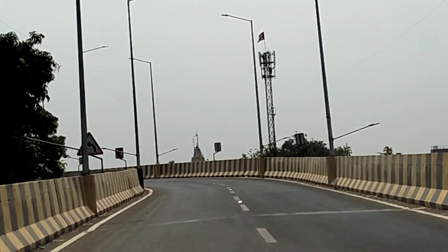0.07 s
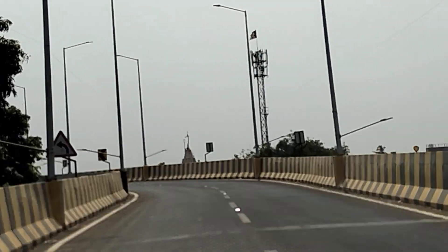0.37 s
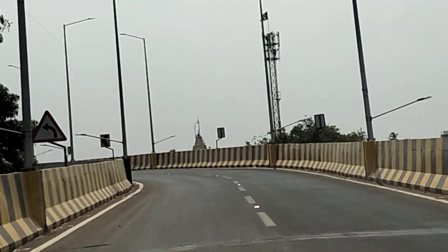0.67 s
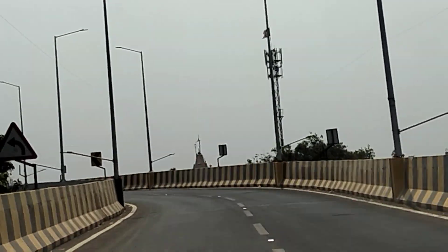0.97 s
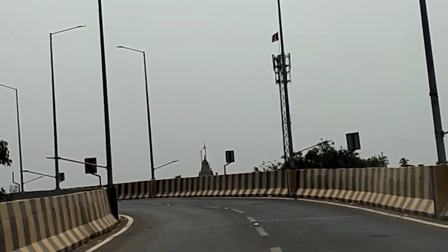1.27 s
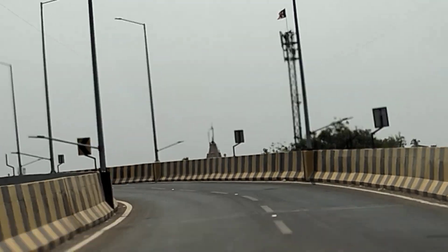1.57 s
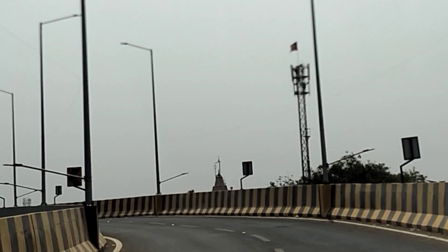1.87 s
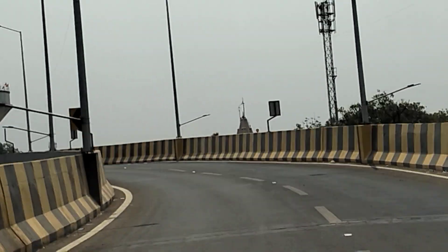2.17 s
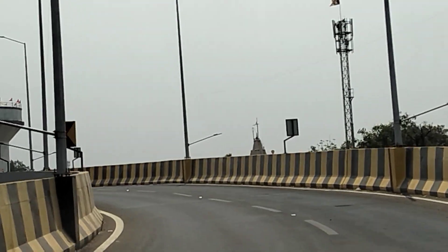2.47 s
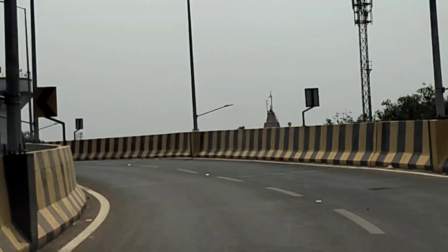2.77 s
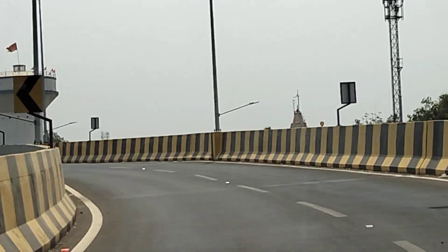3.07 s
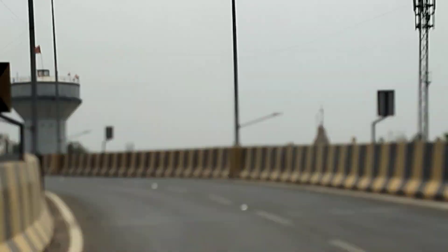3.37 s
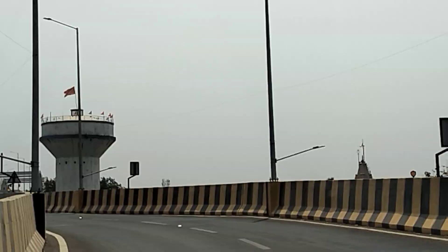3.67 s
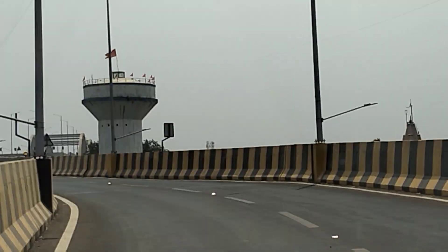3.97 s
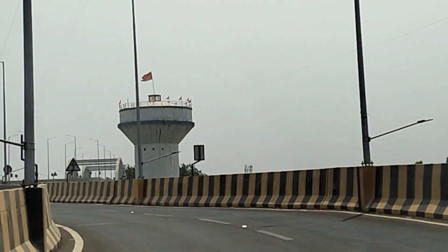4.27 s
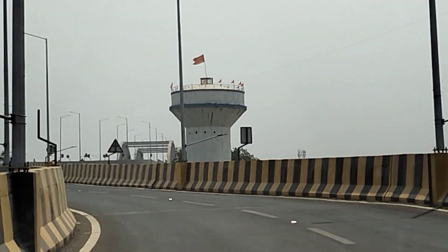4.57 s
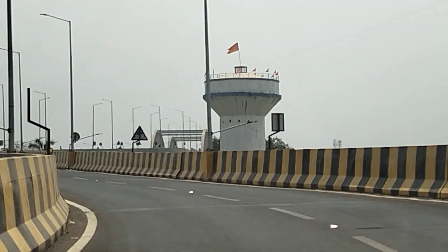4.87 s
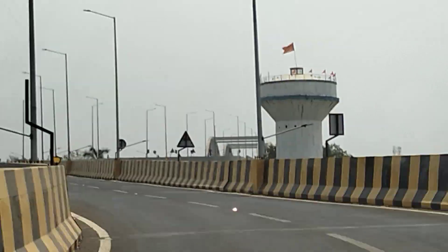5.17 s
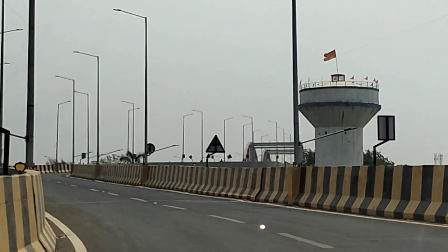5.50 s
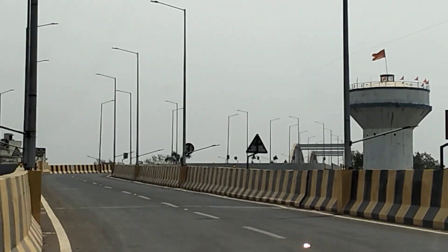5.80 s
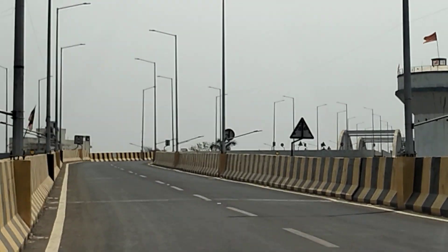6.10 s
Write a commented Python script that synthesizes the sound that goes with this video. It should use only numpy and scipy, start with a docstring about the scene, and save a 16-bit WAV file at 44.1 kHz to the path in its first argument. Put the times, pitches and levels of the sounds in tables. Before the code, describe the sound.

Low road rumble and tyre hiss inside a moving car, with heavy wheel thumps over road joints and small trim rattles.

```python
"""Inside a car rounding a concrete flyover, slowing a little. From the start road rumble fills the cabin;
tyres and wind hiss at the right window. About every 1.5 s the front, then the rear wheels thump over
an expansion joint and hop once. A gain control ducks after each heavy thump and slowly recovers.
Small bumps follow between the joints; the trim ticks, rattles and creaks."""
import sys
import numpy as np
from scipy import signal
from scipy.fft import rfft, irfft
from scipy.io import wavfile

SR = 44100
rng = np.random.default_rng(int(sys.argv[2]) if len(sys.argv) > 2 else 0)


def store_pcm(level_fs):
    """Save levels as 16-bit WAV."""
    pcm = np.round(np.clip(level_fs, -1, 1) * 32767).astype(np.int16)
    wavfile.write(sys.argv[1], SR, np.atleast_2d(pcm).T)


N = 275184
TIME, FREQ = np.arange(N) / SR, np.maximum(np.arange(N // 2 + 1) * SR / N, 1)

# likeness of left and right in the cabin: f/Hz, correlation
CABIN_CORRELATION = [(100, 0.98), (190, 0.98), (300, 0.69), (480, 0.41), (680, 0.51), (850, -0.53),
                     (1300, -0.21), (3000, -0.095)]
# road rumble, relative density: f/Hz, left/dB, right/dB
RUMBLE_SPECTRUM = [(28, -38, -38.5), (45.3, -42.5, -40.5), (72.4, -42, -41), (92, -41, -39),
                   (120, -40.5, -40), (149, -44.5, -44), (194.5, -44, -41.5), (218.4, -55.5, -48.5),
                   (346.6, -50.5, -48), (420, -58, -58.5), (566, -62.5, -62.5)]
# roar, the upper part of the rumble: t/s, level/dB
ROAR_SWELL = [(0, 0.8), (0.36, 1), (0.6, 0), (0.95, 1.5), (1.45, 0.2), (1.75, 0), (2.1, -1), (2.5, -0.5),
              (3.1, 1), (3.45, -1.5), (4.05, -1.8), (4.6, 0.4), (5.25, -0.9), (5.65, -0.7), (6.24, 1.2)]
# tyre and wind hiss, relative density: f/Hz, left/dB, right/dB
HISS_SPECTRUM = [(670, -71.5, -64.5), (900, -65, -69), (1020, -71, -75.5), (1630, -76.5, -67),
                 (2310, -79.5, -71.5), (2670, -82.5, -74), (4480, -87, -76.5), (4760, -87, -74),
                 (6140, -90.5, -86), (7560, -101.0, -86.5), (9120, -100.9, -100.7), (10930, -100.8, -90),
                 (12100, -102.5, -90.5), (14100, -107.6, -97.5)]
# course of the hiss: t/s, level/dB
HISS_SWELL = [(0, -0.5), (0.35, 0), (0.6, -0.3), (0.8, -0.5), (1.4, 0.8), (2.1, -0.8), (2.4, -0.9),
              (2.72, 1.0), (3.15, 0.1), (3.5, -0.5), (3.8, -0.7), (4.5, 0.9), (5.4, 0), (6.24, 1)]
# resonances of tread and glass: f/Hz, width/Hz, left/dB, right/dB
TREAD_GLASS_MODES = [(845, 40, -45.5, -74), (948.5, 41, -46.5, -44.5), (1155, 35, -48.5, -46.5),
                     (1253, 28, -49, -57), (1363, 22, -64, -53.5), (2177, 16, -82, -58),
                     (3783, 66, -65.5, -54.5), (4474, 70, -89, -52.5), (5100, 220, -64, -58)]
# resonances of the window seal: f/Hz, width/Hz, level/dB
SEAL_MODES = [(1559, 51, -44.5), (1620, 52, -53.5), (1787, 90, -45.5), (2476, 130, -53)]
# course of the seal's song: t/s, level/dB
SEAL_SWELL = [(0.15, 3), (0.6, 0.5), (1.4, 2), (2.3, 0), (2.75, 3.5), (3.3, 1), (3.9, 0), (4.55, 2),
              (6.24, -1.5)]
# panel creaks: t/s, level/dB, f/Hz, t60/s
PANEL_CREAKS = [(0.118, -27.5, 1750, 0.07), (4.516, -41, 3860, 0.16), (5.204, -30.5, 2200, 0.1),
                (5.36, -39, 4100, .16)]
# rattles of a loose part: t/s, level/dB
PART_RATTLES = [(1.771, -42), (1.931, -42.5), (3.445, -47)]
# trim ticks: t/s, tick/dB, snap/dB
TRIM_TICKS = [(1.683, -18, -28), (1.695, -17, -27), (1.741, -21, -30), (1.93, -25, -40), (3.45, -21, -33),
              (4.531, -30, -26.5), (5.195, -20, -35)]
# tick colour, relative density: f/Hz, level/dB
TICK_SPECTRUM = [(300, -10), (750, 15.5), (1150, 14), (1700, -13), (2500, -14), (4400, -8.5), (6500, -15),
                 (9000, -32), (13000, -29)]
# hardest blows, reaching the suspension: t/s, tyre boom/dB, clunk/dB
HARD_KNOCKS = [(0.222, -22, -13.5), (0.251, -7, -23), (1.698, -25, -13.5), (1.716, -7.5, -18),
               (1.869, -18, -22), (3.232, -29, -16.5), (4.907, -13, -14)]
# tread slap on a joint's edge, relative density: f/Hz, level/dB
SLAP_SPECTRUM = [(60, -5), (110, -16), (200, -6.5), (340, -3), (500, -4), (700, -13), (1400, -21),
                 (4000, -51)]
# body and cabin modes, from heave on the springs up: f/Hz, t60/s, front axle/dB, rear axle/dB
BODY_MODES = [(4.15, 0.8, -10.5, 6), (30.85, 0.46, -23.5, -7.5), (47.6, 0.29, -16, -8.5),
              (59.2, 0.427, -19.5, -8.5), (93.65, 0.31, -5.5, -8.5), (112.8, 0.34, -4, -18.5),
              (153.5, 0.25, -22, -39), (190.8, 0.22, -26, -25)]
# small bumps in the asphalt: t/s, blow/dB
ASPHALT_BUMPS = [(0.956, -6.5), (1.09, -6.5), (1.262, -11), (2.545, -8), (2.798, -11.5), (3.04, -10),
                 (4.161, -10), (4.29, -7.5), (4.37, -9), (4.468, -10.5)]
# four wheels in turn per joint, front pair first: t/s, blow/dB, rear share/0-1, hop/dB re blow, slap/dB
JOINT_HITS = [(0.222, 0.5, 0.2, 0.5, -17.5), (0.2413, -2.5, 0, -22, -23), (0.3842, 1, 1, -12, -35),
              (0.42, -0.2, 0.83, -2.5, -30), (1.6888, -2.5, 1, -25, -21), (1.725, -1, 0.53, -21, -24),
              (1.8634, 2, 0.89, -12, -37), (1.8905, 1.5, 0.93, -9, -30), (3.2318, 3, 0.58, -12, -23.5),
              (3.29, 1.5, 0.28, -6.5, -35), (3.4245, 2, 0.96, -34, -33), (3.4502, -0.5, 1, -3, -25),
              (4.9289, 1.5, 0.57, -9, -20.5), (4.955, -4, 0.02, -1, -35), (5.1417, 3, 1, -7.5, -36),
              (5.18, -7.5, 0.93, -12, -40)]


def from_db(db):
    """Decibels to gain."""
    return np.exp(np.asarray(db) * (np.log(10) / 20))


def rms_one(x):
    """Scale to unit rms."""
    return x / np.sqrt(np.mean(x ** 2) + 1e-20)


def over_hz(points):
    """Table columns interpolated over log frequency."""
    hz, *columns = np.transpose(points)
    return np.array([np.interp(np.log(FREQ), np.log(hz), c) for c in columns])


def over_time(points):
    """Table interpolated over time."""
    return np.interp(TIME, *np.transpose(points))


def resonance(hz, width_hz):
    """Amplitude per root Hz of a unit-power resonance."""
    shape = 1 / (1 + ((FREQ - hz) / (0.83 * width_hz)) ** 2)
    return shape / np.sqrt(np.sum(shape ** 2) * SR / N)


def noise(gain):
    """Noise of a given amplitude per root Hz."""
    real, imaginary = rng.standard_normal((2, len(FREQ))) * gain
    return irfft(real + 1j * imaginary, N) * np.sqrt(N * SR) / 2


def drift(rate_hz):
    """Slow random wander, unit rms."""
    return rms_one(noise(1 / (1 + (FREQ / rate_hz) ** 2)))


def cabin_noise(gain):
    """Diffuse stereo noise; the sides agree only in the bass."""
    mid, side = rfft(rng.standard_normal((2, N)))
    alike = over_hz(CABIN_CORRELATION)
    pair = np.sqrt(1 + alike) * mid + np.sqrt(1 - alike) * side * [[1], [-1]]
    return irfft(pair * gain, N) * np.sqrt(SR) / 2


def burst(start_s, rise_s, t60_s):
    """Envelope of a blow: quick rise, exponential decay."""
    envelope, first = np.zeros(N), int(start_s * SR)
    age = TIME[:min(int(2 * t60_s * SR), N - first)]
    envelope[first:first + len(age)] = (1 - np.exp(-age / rise_s)) * from_db(-60 * age / t60_s)
    return envelope


def reflections(depth=0.41, shortest_s=0.001918, longest_s=0.014, dull_hz=3500, count=6):
    """Short, dull cabin echoes ripple each side's spectrum."""
    delays_s = rng.uniform(shortest_s, longest_s, (count, 2, 1))
    strength = depth / np.sqrt(1 + (FREQ / dull_hz) ** 2)
    echoes = sum(np.exp(-2j * np.pi * FREQ * delay) for delay in delays_s)
    return (1 + strength / np.sqrt(count) * echoes) / np.sqrt(1 + strength ** 2)


def road_rumble(gain_db=-0.5, lumpy_db=0.45, top_hz=620, roar_hz=150, drone_db=-28):
    """Rough asphalt shakes the body unevenly and keeps the cabin droning; roar follows its coarseness."""
    shape = from_db(over_hz(RUMBLE_SPECTRUM) + gain_db) / np.sqrt(1 + (FREQ / top_hz) ** 16)
    road = cabin_noise(shape)
    roar = irfft(rfft(road) / (1 + (roar_hz / FREQ) ** 8), N)
    road = road - roar + roar * from_db(over_time(ROAR_SWELL))
    drone = from_db(drone_db) * noise(resonance(hz=99, width_hz=26))
    return road * from_db(lumpy_db * drift(rate_hz=9.6)) + drone


def tyre_wind_hiss(gain_db=-1.11, flutter_db=0.5, low_hz=630):
    """Broad tyre and wind noise; tread and glass resonances stand out."""
    shape = from_db(over_hz(HISS_SPECTRUM) + gain_db) / np.sqrt(1 + (low_hz / FREQ) ** 16)
    power = sum((from_db([[left_db], [right_db]]) * resonance(hz, width_hz)) ** 2
                for hz, width_hz, left_db, right_db in TREAD_GLASS_MODES)
    ringing = np.array([noise(np.sqrt(side)) for side in power])
    hiss = cabin_noise(shape * reflections())
    return (hiss + ringing) * from_db(over_time(HISS_SWELL) + flutter_db * drift(rate_hz=24))


def window_seal(left_db=-5, lag_s=0.00039, gust_db=0.5):
    """Air sings in the right window seal; it reaches the left later and weaker."""
    power = sum((from_db(db) * resonance(hz, width_hz)) ** 2 for hz, width_hz, db in SEAL_MODES)
    song = noise(np.sqrt(power)) * from_db(over_time(SEAL_SWELL) + gust_db * drift(rate_hz=4.3))
    return np.array([from_db(left_db) * np.interp(TIME - lag_s, TIME, song), song])


def creaks(width_hz=400, left_db=-12):
    """Panels creak briefly where they rub."""
    rubs = sum(from_db(db) * burst(s, t60_s / 20, t60_s) * noise(resonance(hz, width_hz))
               for s, db, hz, t60_s in PANEL_CREAKS)
    return rubs * from_db([[left_db], [0]])


def rattles(gap_s=0.0072, loss_db=1, left_db=-6, count=3):
    """A loose part chatters in short, uneven, dying runs of touches."""
    runs = gap_s * rng.uniform(0.7, 1.3, (len(PART_RATTLES), count))
    touches = sum(from_db(db - loss_db * k) * burst(s + gaps[:k].sum(), rise_s=0.0005, t60_s=0.024)
                  for (s, db), gaps in zip(PART_RATTLES, runs) for k in range(count))
    ringing = np.array([from_db(db) * noise(resonance(hz=7300, width_hz=1100)) for db in (left_db, 0)])
    return touches * ringing


def trim_ticks(snap_left_db=-16):
    """Jolted plastic panels tick, each with a bright snap from the right door."""
    ticks = sum(from_db(db) * burst(s, rise_s=0.00036, t60_s=0.016) for s, db, _ in TRIM_TICKS)
    snaps = sum(from_db(db) * burst(s, rise_s=0.0013, t60_s=0.028) for s, _, db in TRIM_TICKS)
    door = np.array([from_db(db) * noise(resonance(hz=4100, width_hz=900)) for db in (snap_left_db, 0)])
    panels = rms_one(cabin_noise(from_db(over_hz(TICK_SPECTRUM))))
    return ticks * panels + snaps * door


def knocks(rise_s=0.0051, upper_db=-4.5):
    """The hardest blows set the tyre's air booming; the suspension clunks in two modes."""
    def ring(s, db, hz, t60_s):
        """One struck mode."""
        return from_db(db) * burst(s, rise_s, t60_s) * np.sin(2 * np.pi * hz * (TIME - s))
    return sum(ring(s, boom_db, hz=204, t60_s=0.098)
               + ring(s, clunk_db, hz=355, t60_s=0.091)
               + ring(s, clunk_db + upper_db, hz=490, t60_s=0.073)
               for s, boom_db, clunk_db in HARD_KNOCKS)


def tread_slaps(lead_s=0.017):
    """Soft tread slaps the joint's edge just before each blow."""
    slaps = sum(from_db(db) * burst(s - lead_s, rise_s=0.007, t60_s=0.13) for s, *_, db in JOINT_HITS)
    return slaps * rms_one(cabin_noise(from_db(over_hz(SLAP_SPECTRUM))))


def wheel_blows(hop_s=0.0678):
    """A wheel hits a joint and hops once; bumps jolt only the front. Yields t/s, blow/dB, rear share."""
    for start_s, blow_db, rear_share, hop_db, _ in JOINT_HITS:
        yield start_s, blow_db, rear_share
        yield start_s + hop_s, blow_db + hop_db, rear_share
    for start_s, blow_db in ASPHALT_BUMPS:
        yield start_s, blow_db, 0


def body_thumps(contact_s=0.0036):
    """Each wheel blow rings the body and cabin modes."""
    thumps = np.zeros(N)
    for start_s, blow_db, rear_share in wheel_blows():
        first = int(start_s * SR)
        age = TIME[:min(SR, N - first)]
        for hz, t60_s, front_db, rear_db in BODY_MODES:
            level_db = blow_db + front_db + rear_share * (rear_db - front_db)
            swing = np.sin(2 * np.pi * hz * age) * (1 - np.exp(-age / contact_s))
            thumps[first:first + len(age)] += from_db(level_db - 60 * age / t60_s) * swing
    return thumps


def scene():
    """Everything heard from the front seat."""
    background = road_rumble() + tyre_wind_hiss() + window_seal()
    wheels = (body_thumps() + tread_slaps()) * from_db([[-0.4], [0.3]])  # slightly right
    return background + wheels + knocks() + trim_ticks() + rattles() + creaks()


def gain_control(x, threshold_db=1.5, slope=0.92, window_s=0.021, release_db_per_s=14.5, attack_s=0.048):
    """Heavy pressure swings, inaudible heave included, pull the gain down; it creeps back."""
    def smooth(values, tau_s):
        """One-pole average."""
        pole = np.exp(-1 / (tau_s * SR))
        return signal.lfilter([1 - pole], [1, -pole], values)
    level_db = 10 * np.log10(smooth(np.mean(x ** 2, axis=0), window_s) + 1e-9)
    excess_db = slope * np.maximum(level_db - threshold_db, 0)
    release_db = release_db_per_s * TIME
    held_db = np.maximum.accumulate(excess_db + release_db) - release_db
    return x * from_db(-smooth(held_db, attack_s))


def record(dry):
    """Gain control, steep subsonic filter, rounded peaks, treble cut-off."""
    subsonic_hz, cutoff_hz, ceiling = 24.3, 14250, 0.92
    sound = np.pad(gain_control(dry), [(0, 0), (SR // 10, 0)], "reflect")  # filter run-in
    sound = signal.sosfilt(signal.butter(6, subsonic_hz, "highpass", fs=SR, output="sos"), sound)
    sound = sound / (1 + (sound / ceiling) ** 8) ** (1 / 8)
    return signal.sosfilt(signal.ellip(12, 0.1, 80, cutoff_hz, fs=SR, output="sos"), sound)[:, -N:]


dry = scene()
out = record(dry)
store_pcm(out)
```